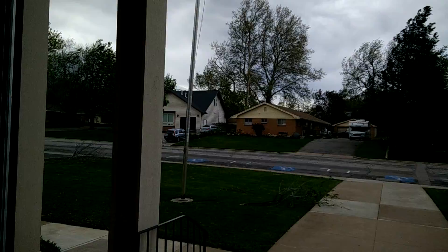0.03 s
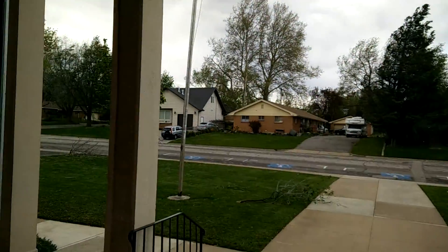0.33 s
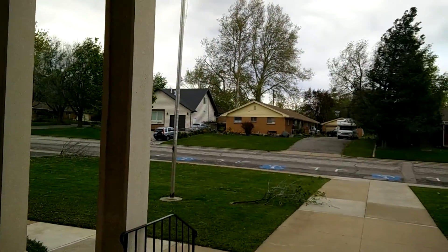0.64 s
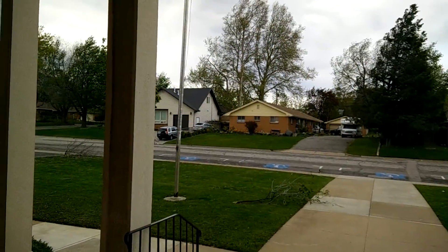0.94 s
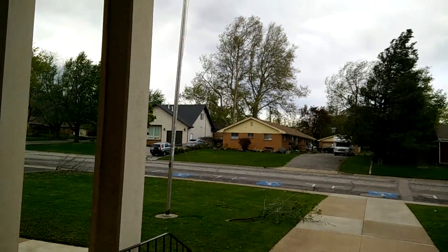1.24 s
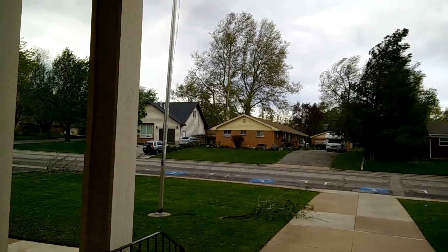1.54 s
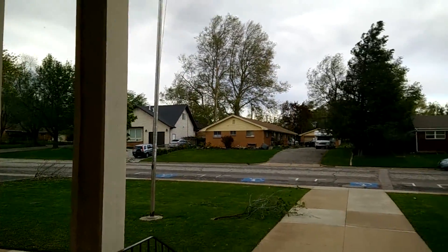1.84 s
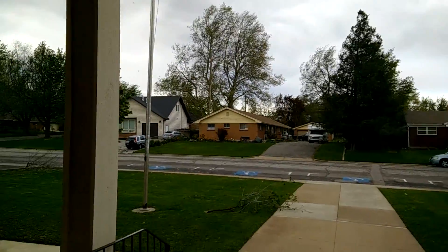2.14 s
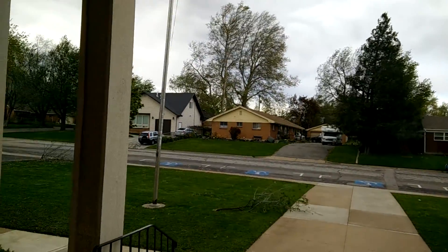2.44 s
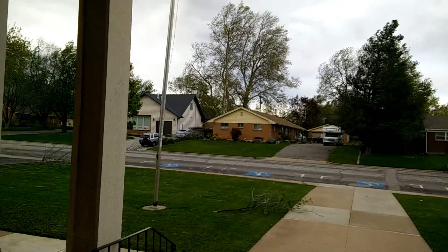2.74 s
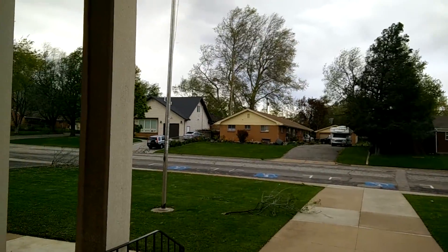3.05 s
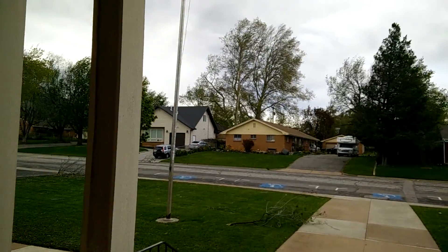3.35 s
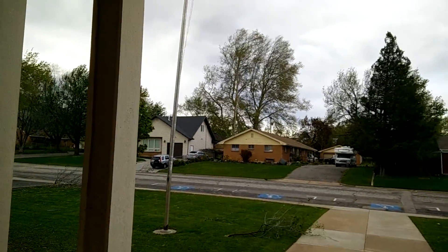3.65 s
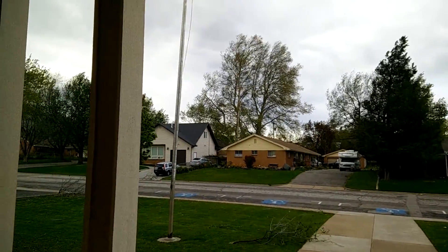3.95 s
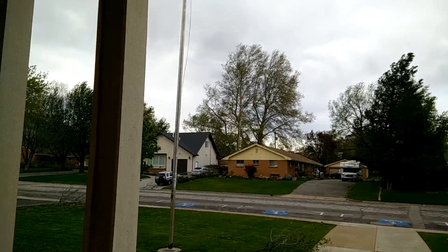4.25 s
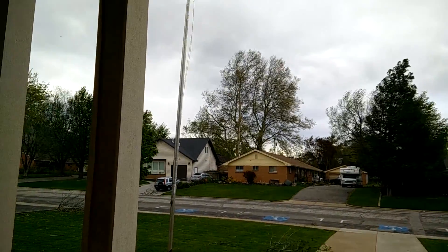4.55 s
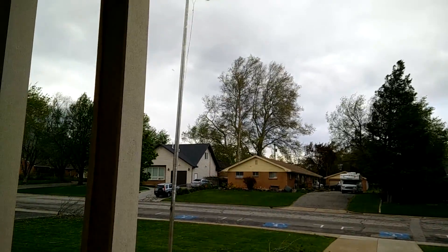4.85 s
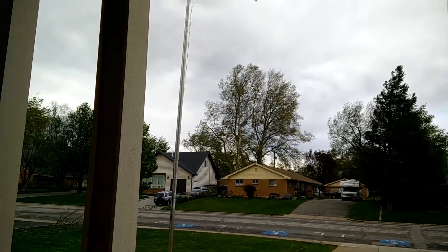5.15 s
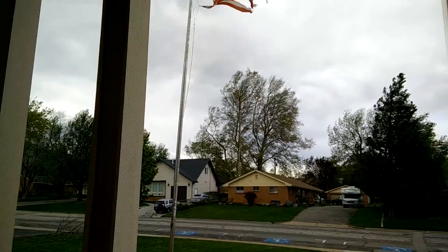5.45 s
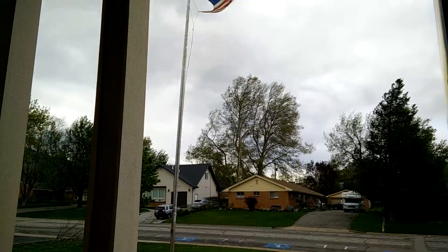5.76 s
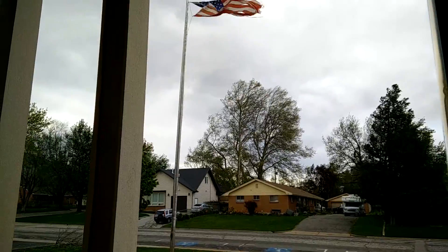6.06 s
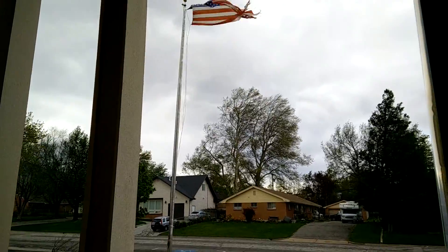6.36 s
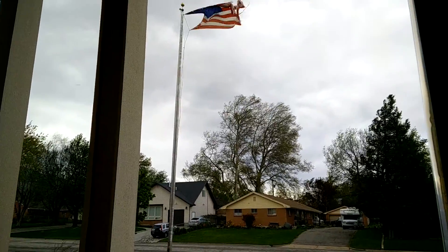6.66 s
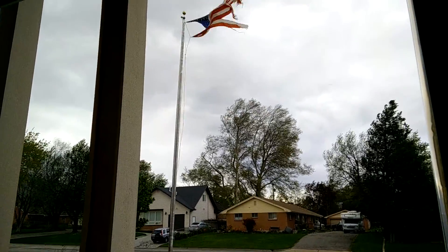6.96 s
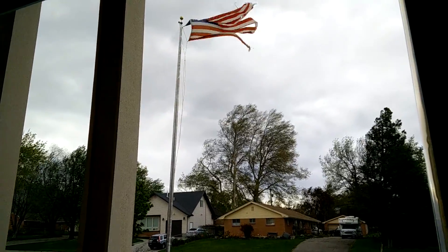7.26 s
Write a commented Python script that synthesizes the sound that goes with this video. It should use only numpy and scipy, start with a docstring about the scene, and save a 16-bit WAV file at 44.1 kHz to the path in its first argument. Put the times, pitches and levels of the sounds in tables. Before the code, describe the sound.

A rope slaps a metal flagpole in short ringing clanks as gusty wind booms close by and leaves rustle.

```python
"""A house porch in strong gusts, heard on a hand-held stereo phone that fades in after a moment of silence.
Far trees hiss and nearer leaves rustle. Around the microphone, air rushes past posts and eaves,
and eddies boom in the low resonances of the porch. Out on the lawn, to the left, a halyard slaps
its metal flagpole in short rattling clanks, with small dry ticks in between."""
import sys
import numpy as np
from scipy import signal
from scipy.fft import rfft, irfft, next_fast_len
from scipy.io import wavfile
from scipy.ndimage import uniform_filter1d

SR = 44100
rng = np.random.default_rng(int(sys.argv[2]) if len(sys.argv) > 2 else 0)


def generate_wav(sig):
    """Save sig (samples, or channels by samples) to the path in sys.argv[1] as 16-bit PCM at SR."""
    pcm = np.round(np.clip(np.atleast_2d(sig).T, -1, 1) * 32767).astype(np.int16)
    wavfile.write(sys.argv[1], SR, pcm)


N = 322812
TIME = np.arange(N) / SR
PADDED, RING_N = next_fast_len(N, True), SR // 3  # samples in the scene's FFT and in one clank
FREQS = np.arange(PADDED // 2 + 1) * SR / PADDED + 1e-3
POLE_FREQS = np.arange(RING_N // 2 + 1) * SR / RING_N + 1e-3
POLE_LEAD = 13  # samples by which the pole's sound reaches the left microphone first
LOW_NOTES_HZ = 3500  # the tube's low notes lie below this

# The flagpole stands to the left. Each row: frequency in Hz, left minus right in dB.
POLE_BALANCE = [(1500, 3.5), (4500, 2.5), (8000, 7), (13000, 0)]


def undb(db):
    """Decibels to gain."""
    return 10 ** (np.asarray(db) / 20)


def unit(x):
    """Scale to rms 1."""
    return x / np.sqrt(np.mean(x ** 2))


def curves(table):
    """The columns of a table, joined by straight lines over the times in its first column."""
    times, *columns = np.transpose(table)
    return [np.interp(TIME, times, column) for column in columns]


def across(points, freqs=FREQS):
    """(Hz, value) points joined on a log-frequency axis."""
    hz, value = np.transpose(points)
    return np.interp(np.log(freqs), np.log(np.sort(hz)), value)


def shape(x, gain):
    """Filter by a gain at every frequency."""
    return irfft(rfft(x, PADDED) * gain, PADDED)[..., :N]


def resonances(modes, freqs=FREQS):
    """Gain of a set of (Hz, half-width in Hz, dB) resonances whose powers add."""
    return np.sqrt(sum(undb(db) ** 2 / (1 + ((freqs - hz) / width) ** 2) ** 2 for hz, width, db in modes))


def walk(rate):
    """Random levels, each held 1 / rate seconds, smoothed twice; rms 1."""
    hold = max(int(SR / rate), 2)
    held = rng.standard_normal(N)[np.arange(N) // hold]
    return unit(uniform_filter1d(uniform_filter1d(held, hold), hold))


def swell(peak_s, rise_s, fall_s):
    """A bell in time that peaks at 1."""
    return np.exp(-((TIME - peak_s) / np.where(TIME < peak_s, rise_s, fall_s)) ** 2)


def microphones(pair, gain):
    """Colour two unrelated noises and blend them to left and right: alike in bass, apart in treble."""
    # How alike the two microphones hear the wind. Each row: frequency in Hz, correlation.
    likeness = [(60, .989), (130, .985), (200, .975), (350, .84), (700, .5), (1400, -.15), (2600, .03),
                (5000, -.06), (12000, 0)]
    # Where the wind sits between them. Each row: frequency in Hz, left minus right in dB.
    balance = [(80, -1.5), (300, -0.5), (700, -.5), (1300, 1), (2400, 3.5), (5000, 3), (8000, 5),
               (14000, -1)]
    alike = np.clip(across(likeness), -.999, .999)
    mid = shape(pair[0], gain * np.sqrt(1 + alike))
    side = shape(pair[1], gain * np.sqrt(1 - alike))
    lean_db = across(balance) / 2
    stereo = shape(np.array([mid + side, mid - side]), undb([lean_db, -lean_db]))
    return stereo / np.std(stereo.mean(axis=0))


def trees(hiss_trim_db=1.5, rustle_trim_db=7, grain_db=2.0):
    """Far foliage hisses smoothly; nearer leaves rustle in countless tiny contacts, most in flurries."""
    # Spectra of the far hiss and the near rustle. Each row: frequency in Hz, relative level in dB.
    hiss_spectrum = [(800, 0), (1800, 1.5), (2350, 5), (3200, -2), (4300, -5.5), (5200, 0.5), (7000, -1),
                     (7600, -4.5), (8500, -6.5), (10000, -16.5), (15500, -27)]
    rustle_spectrum = [(2000, -16), (3500, 10.5), (7000, 18.5), (10000, 8.5), (12000, 6.5), (15500, 5)]
    # Level of the hiss: the opening climb is the phone fading in, then it follows the wind.
    # Each row: time in seconds, level in dB before trim.
    hiss_levels = [(.62, -70.5), (.8, -57), (1.27, -52.5), (1.8, -50.5), (2.3, -49.5), (2.7, -52.5),
                   (4.4, -52.5), (4.9, -55), (5.8, -54.5), (6.45, -57), (7.32, -58)]
    # Flurries in the leaves. Each row: peak in seconds, level in dB before trim, half length in seconds.
    flurries = [(1.3, -62.5, 0.29), (1.752, -55, 0.15), (2.164, -62, 0.15)]
    hiss_db, = curves(hiss_levels)
    hiss = microphones(rng.standard_normal((2, N)), undb(across(hiss_spectrum)))
    contacts = rng.standard_normal((2, N)) * undb(grain_db * rng.exponential(size=(2, N)))
    rustle = microphones(contacts, undb(across(rustle_spectrum)))
    stir = undb(-77.5 + 1.9 * (hiss_db + 52))  # the rustle gains 1.9 dB for each dB of hiss
    flurry = sum(undb(db) * swell(peak_s, half_s, half_s) for peak_s, db, half_s in flurries)
    return hiss * undb(hiss_db + hiss_trim_db) + rustle * np.hypot(stir, flurry) * undb(rustle_trim_db)


def wind(eddy_flutter_db=1.5, air_flutter_db=0.39, flutter_hz=12):
    """Levels in dB of the eddies and the rushing air: a slow base, gusts and a quick shared flutter."""
    # Base levels: the opening climb is the phone fading in, then they follow the wind.
    # Each row: time in seconds, eddy level in dB, air level in dB.
    base_levels = [(.62, -63, -66), (.8, -51, -52.5), (1.05, -46.5, -50), (1.5, -41, -47.5),
                   (2.3, -39, -45), (2.85, -43.5, -46.5), (3.5, -41.5, -46), (4.4, -41, -48),
                   (4.85, -41, -47.5), (5.4, -43, -48), (6.0, -45, -49.5), (6.5, -44.5, -50),
                   (7.32, -45.5, -48)]
    # Gusts. Each row: peak in seconds, added rumble in dB, added rush in dB, rise and fall in seconds.
    gusts = [(1.98, 2, 3, 0.055, 0.11), (2.11, 5.5, -1, 0.028, .035), (2.36, 9.5, 7.5, 0.089, 0.12),
             (4.7, 4, 0.5, 0.057, 0.053), (4.945, 9, 9, 0.016, .045), (5.17, 2.5, 5, 0.027, .05),
             (5.71, 9, 6, 0.076, .14), (6.16, 1, 3.5, 0.094, 0.13), (6.76, 7.5, 5, 0.11, 0.11)]
    eddy_db, air_db = curves(base_levels)
    for peak_s, rumble_db, rush_db, rise_s, fall_s in gusts:
        gust = swell(peak_s, rise_s, fall_s)
        eddy_db += rumble_db * gust
        air_db += rush_db * gust
    flutter = walk(flutter_hz)
    return eddy_db + eddy_flutter_db * flutter, air_db + air_flutter_db * flutter


def turbulence(swirl_db=0.34, swirl_hz=30, flicker_db=0.78, flicker_hz=11):
    """Two noises whose octave bands swirl in level together and flicker each on its own."""
    spectrum = rfft(rng.standard_normal((2, N)), PADDED)
    swirl = swirl_db * walk(swirl_hz)
    octaves = np.clip(np.log2(FREQS), 6, 14)
    air = 0
    for centre in range(6, 15):  # 64 Hz to 16 kHz
        weight = np.clip(1 - abs(octaves - centre), 0, 1)
        band = irfft(spectrum * weight, PADDED)[:, :N]
        air += band * undb(swirl + flicker_db * walk(flicker_hz))
    return air


def rush(air_db, trim_db=0.5):
    """Air tears past posts and eaves, faintly coloured by the porch walls."""
    # Spectrum of the rushing air. Each row: frequency in Hz, relative level in dB.
    air_spectrum = [(120, -12), (220, -3.5), (310, -3.5), (450, -4), (700, -7), (1250, -8.5), (1750, -15),
                    (2300, -13), (2750, -23.5), (3400, -29), (6000, -48)]
    # Resonances between the walls. Each row: frequency in Hz, half-width in Hz, relative level in dB.
    wall_modes = [(300, 12, -10), (344.5, 16, -1), (530, 14, -5.5), (668, 32, -4.5), (1170, 150, -7)]
    colour = undb(across(air_spectrum)) * np.hypot(1, resonances(wall_modes))
    return microphones(turbulence(), colour) * undb(air_db + trim_db)


def driven(gain, level_db, steadiness):
    """Wind-driven resonating noise; steadiness, from 0 to 1, evens out its chance beating."""
    sound = microphones(rng.standard_normal((2, N)), gain)
    envelope = abs(signal.hilbert(sound, next_fast_len(N))[:, :N])
    power = uniform_filter1d(np.mean(envelope ** 2, axis=0) / 2, size=3000)
    return unit(sound / power ** (steadiness / 2)) * undb(level_db)


def porch(eddy_db, deepest_hz=52.8, second_hz=100.5, direct_db=-13, deepest_trim_db=1.0):
    """Eddies push on the porch, which booms at two deep resonances and rumbles in the weaker ones."""
    # The two booms come and go. Each row: time in seconds, level in dB before any trim.
    deepest_levels = [(0.62, -69), (0.65, -60), (1.18, -41.5), (1.35, -48), (2.34, -35), (2.58, -54),
                      (2.65, -44), (3.21, -55), (3.38, -37), (3.88, -39.5), (4.02, -55), (4.15, -37.5),
                      (4.63, -44), (4.69, -59), (4.84, -33.5), (5.12, -45), (7.08, -44), (7.32, -56)]
    second_levels = [(.62, -58), (.9, -50.5), (1.15, -43.5), (1.72, -35.5), (1.9, -42.5), (2.35, -38.5),
                     (2.6, -37), (2.78, -45), (3.0, -39.5), (3.35, -44.5), (3.95, -35.5), (4.6, -37.5),
                     (4.95, -44.5), (5.5, -46), (5.7, -38.5), (5.95, -48), (6.82, -39), (7.2, -53.5)]
    # Spectrum of the eddies. Each row: frequency in Hz, relative level in dB.
    eddy_spectrum = [(20, -31), (35, -32), (60, -8.5), (130, -0.5), (220, -0.5), (320, -5.5), (600, -42.5)]
    # The weaker resonances. Each row: frequency in Hz, half-width in Hz, relative level in dB.
    porch_modes = [(79.5, 12, -2.5), (119, 5.4, -28), (144.8, 11, 2), (151, 9.2, -10), (183.4, 14.4, -5.5),
                   (212.2, 4.9, -0.5), (254, 15.7, -8.5), (273, 4.4, -13)]
    deepest_db, = curves(deepest_levels)
    second_db, = curves(second_levels)
    deepest = driven(resonances([(deepest_hz, 4.1, 0)]), deepest_db + deepest_trim_db, steadiness=0.55)
    second = driven(resonances([(second_hz, 7.4, 0)]), second_db, steadiness=0.3)
    colour = undb(across(eddy_spectrum)) * np.hypot(resonances(porch_modes), undb(direct_db))
    return deepest + second + driven(colour, eddy_db, steadiness=0.37)


def ticks(relative_width=0.094, trim_db=1):
    """Light, dry contacts that die at once, each a burst of noise around one pitch."""
    # Each row: start in seconds, level in dB before trim, pitch in Hz, time to fall 60 dB in seconds.
    contacts = [(0.927, -38, 2620, 0.059), (1.008, -42.5, 7260, 0.026), (2.733, -38, 6500, 0.022),
                (3.627, -42, 6240, 0.01), (4.011, -49, 6860, .02), (4.612, -38, 5870, 0.041),
                (4.612, -41, 8200, 0.11), (5.374, -53.5, 6760, .015), (6.026, -53, 10400, 0.027)]
    out, t = np.zeros((2, N + SR)), TIME[:SR // 10]
    for start_s, db, hz, t60 in contacts:
        burst = rng.standard_normal((2, len(t))) * undb(-60 * np.minimum(t / t60, 4))
        tick = signal.lfilter(*signal.iirpeak(hz, 1 / relative_width, fs=SR), burst)
        tick /= np.std(tick[:, :SR // 250])  # the first 4 ms set the level
        start = int(start_s * SR)
        out[:, start:start + len(t)] += tick * undb(db + trim_db)
    return out[:, :N]


def stored(contacts, t60):
    """Amplitude of a mode that gathers the energy of each contact and loses 60 dB in t60 seconds."""
    retained = np.exp(-2 * np.log(1000) / (t60 * SR))
    return np.sqrt(signal.lfilter([1], [1, -retained], contacts ** 2))


def ringing(contacts, gain, t60, db_per_octave, diffuse_db=2):
    """Close modes ring with the contacts and reach the microphones straight and off the porch walls."""
    tilt_db = db_per_octave * np.log2(np.maximum(POLE_FREQS, 1000) / 6000)
    lean_db = across(POLE_BALANCE, POLE_FREQS) / 2
    direct = rng.standard_normal(RING_N)
    scattered = undb(diffuse_db) * rng.standard_normal((2, RING_N))
    paths = np.array([direct, np.roll(direct, POLE_LEAD)]) + scattered
    modes = irfft(rfft(paths) * gain * undb([tilt_db + lean_db, tilt_db - lean_db]), RING_N)
    return unit(modes * stored(contacts, t60))


def pinging(contacts, low_db, place_db=2, pitch_spread=.003):
    """Lone modes of the pole swell with the contacts and fade; the place of the slap favours some."""
    # Each row: frequency in Hz, relative level in dB, time to fall 60 dB in seconds.
    lone_modes = [(1484, 0.5, 0.5), (2862, -3, 0.53), (4660, 8.5, 0.31), (4900, -2, 0.21), (5280, 7, 0.23),
                  (6690, -2, .2), (6883, 3, 0.16), (7050, 5, 0.19), (9240, -5, .2)]
    pings = 0
    for hz, db, t60 in lone_modes:
        place, phase, detune = rng.standard_normal(3)
        gain = undb(db + place_db * place + low_db * (hz < LOW_NOTES_HZ))
        cycles = hz * (1 + pitch_spread * detune) * TIME[:RING_N]
        pings += gain * stored(contacts, t60) * np.sin(2 * np.pi * (cycles + phase))
    left, right = undb(np.array([1, -1]) * across(POLE_BALANCE, 5000) / 2)
    return unit(np.array([left * pings, right * np.roll(pings, POLE_LEAD)]))


def halyard(contacts_per_s=1100, scatter_db=3, release_s=0.007, trim_db=1.0):
    """Each slap runs along the pole as a burst of contacts that crack, clatter and set the tube ringing."""
    # Slaps of the rope. Each row: start in seconds, level in dB before trim, rise and rattle length in
    # seconds, brightness in dB per octave, lift of the low pings in dB (the tube's low ring gets half).
    slaps = [(.842, -35.5, 0.0049, 0.036, 0, 5.5), (1.147, -41, .026, 0.021, -.5, -6),
             (2.341, -38.5, 0.014, .035, -2.5, -5), (2.609, -30.5, .0015, 0.016, 0, 0.5),
             (2.885, -42.5, 0.0052, 0.023, -2, 1), (3.482, -33.5, 0.0031, 0.014, -1, 6.5),
             (4.05, -51, 0.0037, 0.0068, -6, -5), (4.316, -49, .011, .016, -3.5, -10),
             (4.506, -38, 0.0074, 0.027, -2, 7), (5.058, -46, 0.0034, 0.0085, 2, -8),
             (5.545, -49.5, .01, 0.011, -3, 6), (5.681, -44.5, .005, .009, 0.5, -4),
             (5.877, -34.5, .001, 0.022, 0.5, -2), (6.108, -47, .004, .02, -2, -7),
             (6.625, -38.5, .002, 0.028, 0.5, 2), (7.137, -38.5, 0.0074, 0.021, 1.5, 0)]
    # Dense clatter of rope and pole. Each row: frequency in Hz, relative level in dB.
    clatter_spectrum = [(900, -15), (1600, -4), (2300, -3), (3100, -5.5), (4250, -9), (4700, 7),
                        (6000, -1.5), (7200, 1.5), (9200, -2), (10700, -16.5), (12300, -8), (15500, -23)]
    # The pole's clusters of close modes. Each row: frequency in Hz, half-width in Hz, relative dB.
    pole_modes = [(1490, 30, 5), (2360, 89, -4), (2893, 116, 3.5), (3070, 340, -5.5), (4640, 48, 4),
                  (4830, 120, -1), (5110, 120, 10), (5580, 120, 6), (5830, 120, -9), (6860, 77, 7),
                  (6780, 150, 0), (7300, 180, -12), (8100, 140, -11), (8750, 160, -18), (9330, 75, -8),
                  (11800, 220, -12), (12700, 220, -29)]
    out, t = np.zeros((2, N + RING_N)), TIME[:RING_N]
    rattle = undb(across(clatter_spectrum, POLE_FREQS))
    tube = resonances(pole_modes, POLE_FREQS)
    for start_s, db, rise_s, length_s, brightness, low_db in slaps:
        touches = rng.random(RING_N) < contacts_per_s / SR
        envelope = np.minimum(t / rise_s, 1) * np.exp(-np.maximum(t - length_s, 0) / release_s)
        contacts = touches * envelope * undb(scatter_db * rng.standard_normal(RING_N))
        low_lift = undb(low_db / 2 * (POLE_FREQS < LOW_NOTES_HZ))
        clatter = ringing(contacts, rattle, t60=0.21, db_per_octave=brightness)
        crack = ringing(contacts, rattle, t60=0.011, db_per_octave=brightness)
        ring = ringing(contacts, tube * low_lift, t60=0.39, db_per_octave=brightness)
        clank = clatter + undb(-1) * (crack + ring) + undb(-5) * pinging(contacts, low_db)
        clank /= np.std(clank[:, :SR // 20])  # the first 50 ms set the level
        start = int(start_s * SR)
        out[:, start:start + RING_N] += clank * undb(db + trim_db)
    return out[:, :N]


def scene():
    """Wind close by on the porch and farther off in the trees, with the flagpole on the lawn."""
    eddy_db, air_db = wind()
    return porch(eddy_db) + rush(air_db) + trees() + halyard() + ticks()


def record(dry, open_s=0.611, fade_s=.015, low_cut_hz=42.3, top_hz=15800):
    """The phone fades in from silence and cuts the lowest rumble and the highest treble."""
    fade_in = np.clip((TIME - open_s) / fade_s, 0, 1)
    low_cut = signal.butter(8, low_cut_hz, "high", fs=SR, output="sos")
    high_cut = signal.ellip(10, .2, 70, top_hz, fs=SR, output="sos")
    return signal.sosfilt(high_cut, signal.sosfilt(low_cut, dry) * fade_in)


dry = scene()
out = record(dry)
generate_wav(out)
```